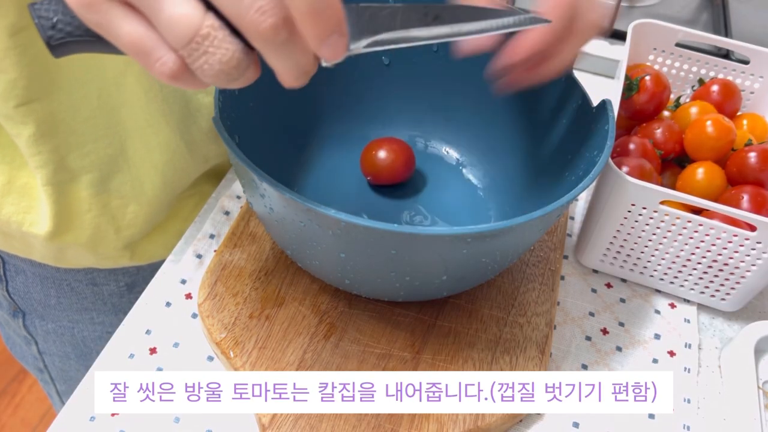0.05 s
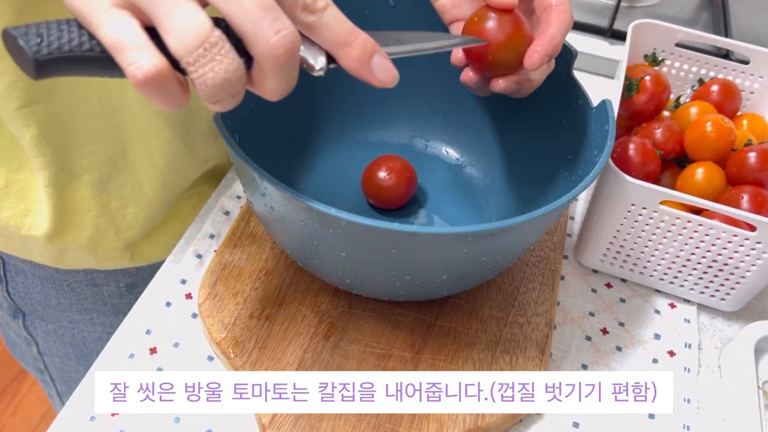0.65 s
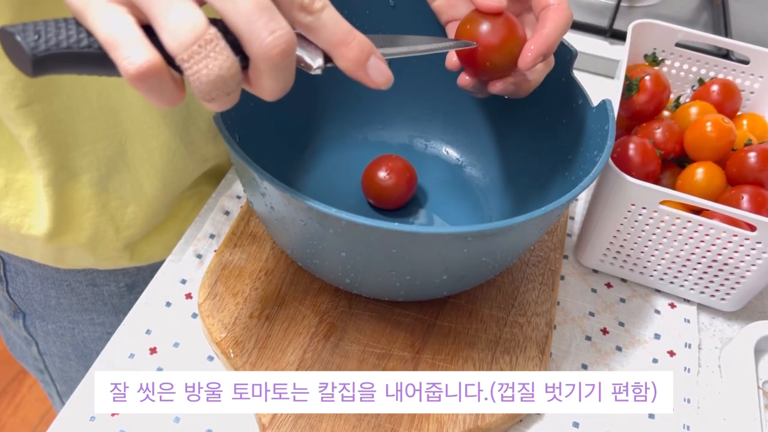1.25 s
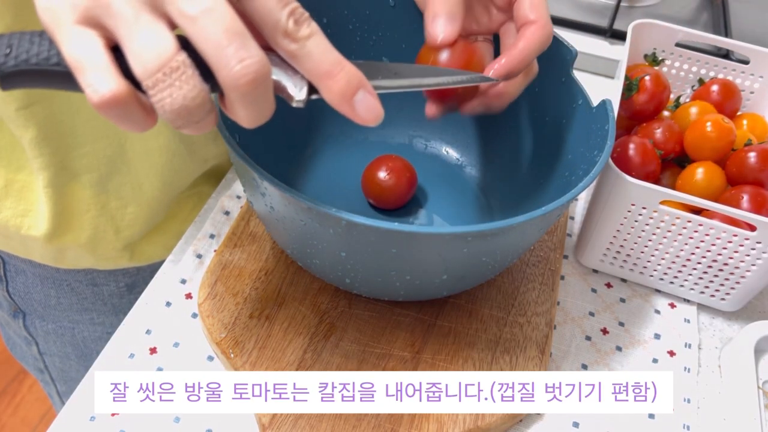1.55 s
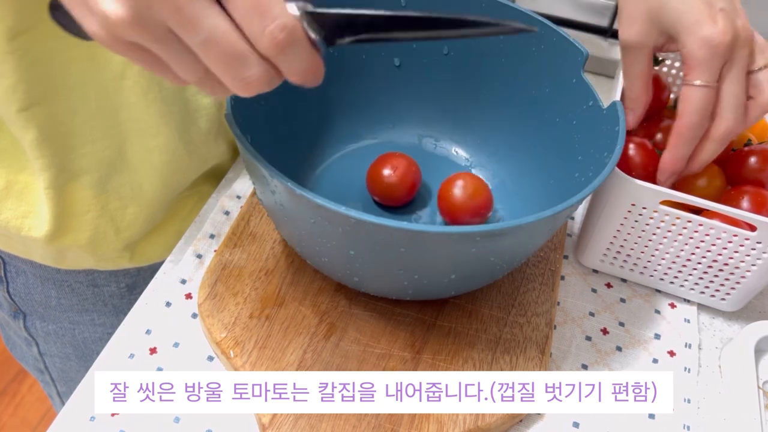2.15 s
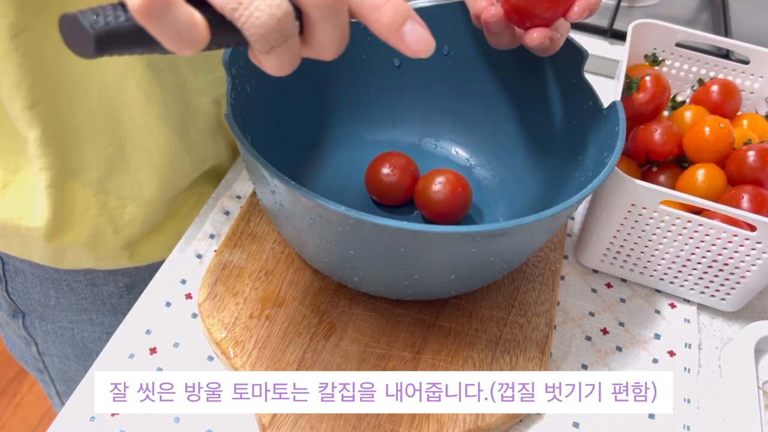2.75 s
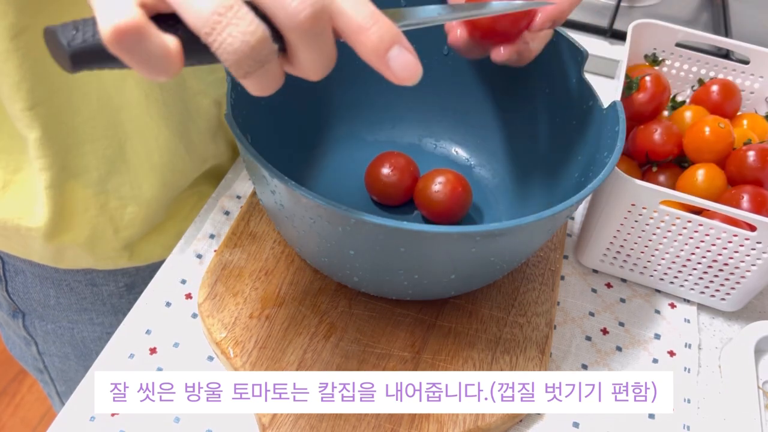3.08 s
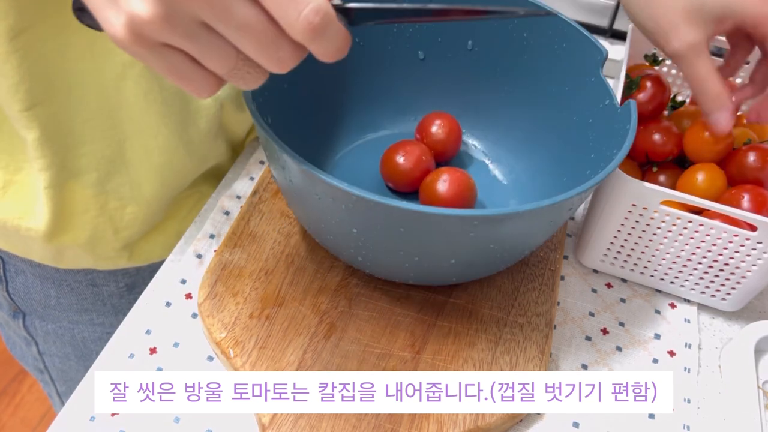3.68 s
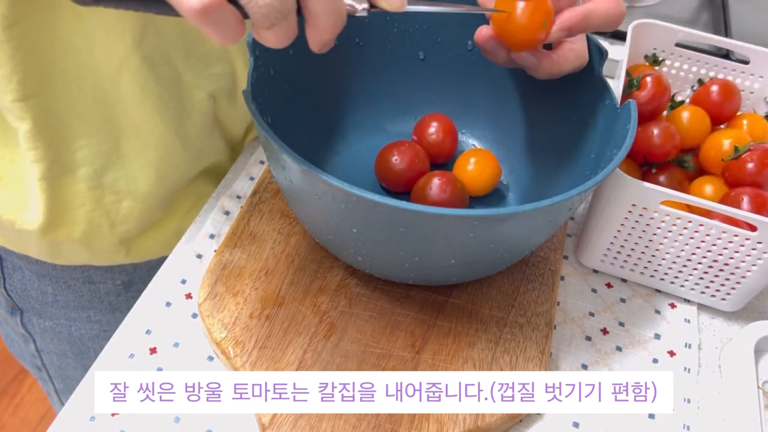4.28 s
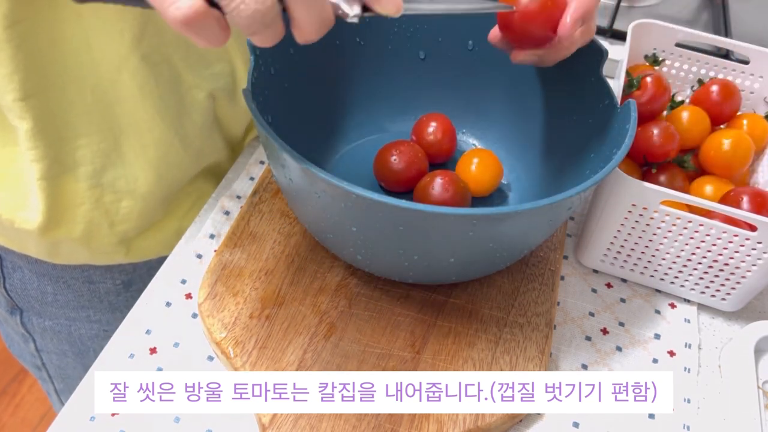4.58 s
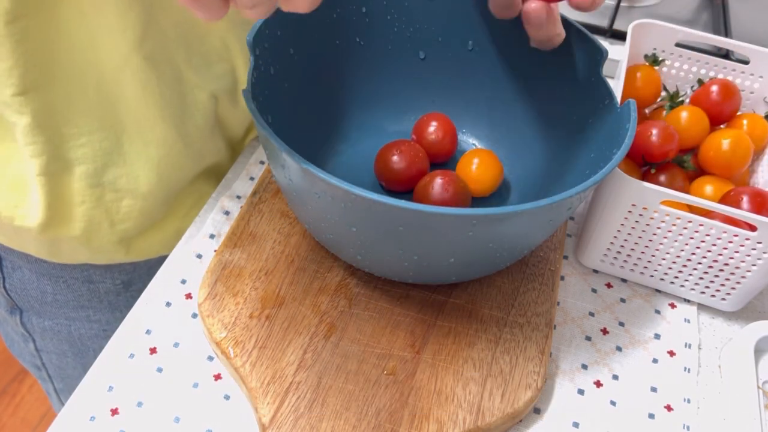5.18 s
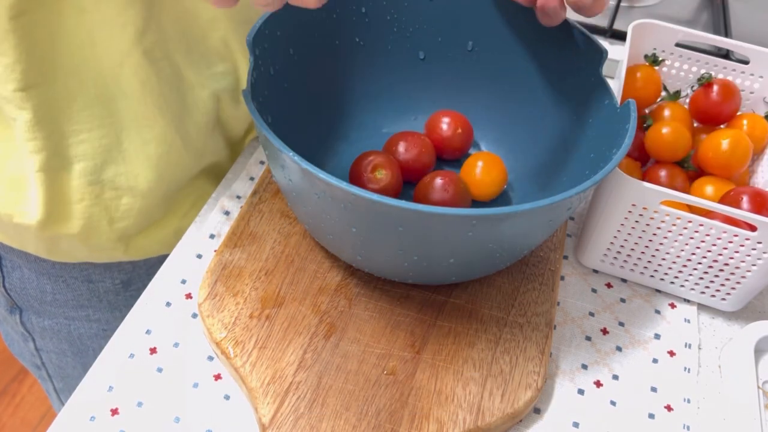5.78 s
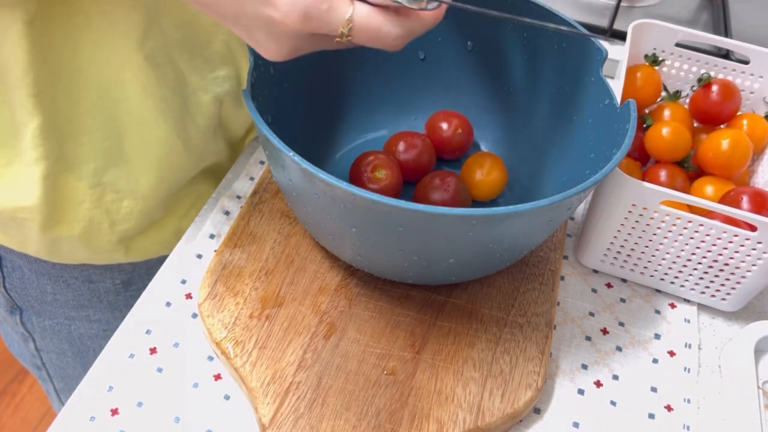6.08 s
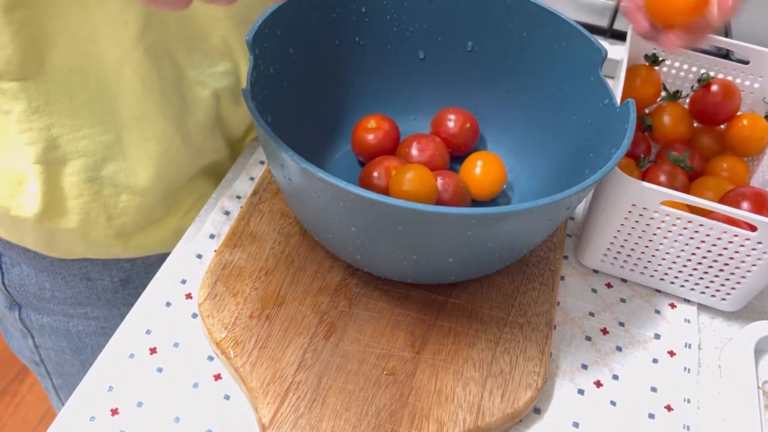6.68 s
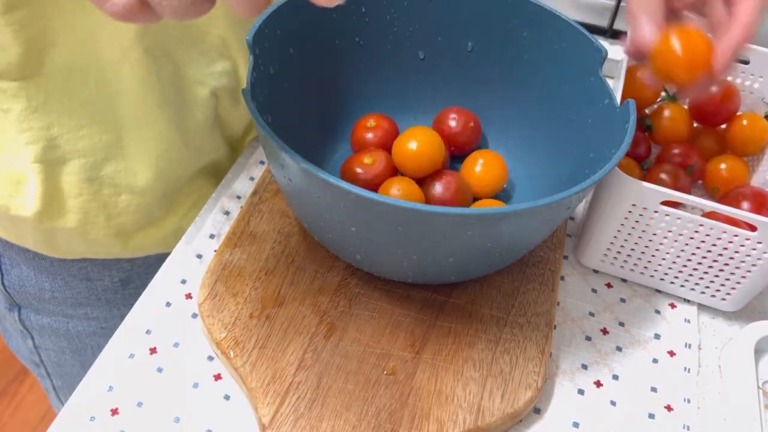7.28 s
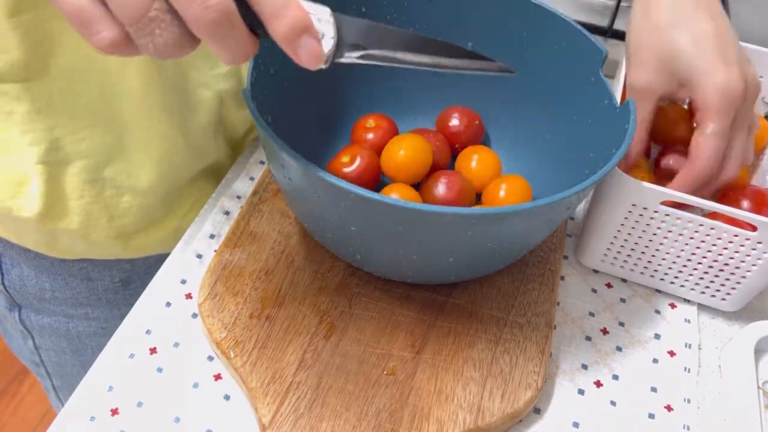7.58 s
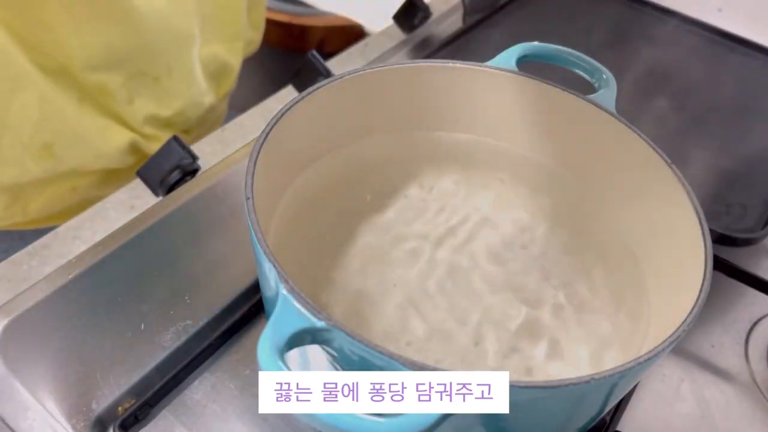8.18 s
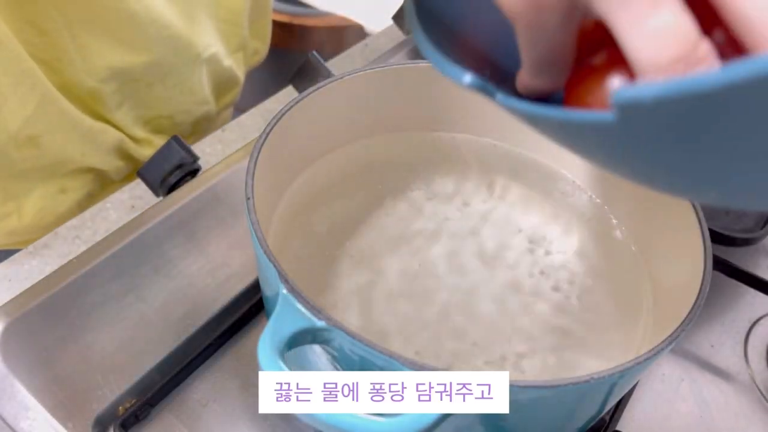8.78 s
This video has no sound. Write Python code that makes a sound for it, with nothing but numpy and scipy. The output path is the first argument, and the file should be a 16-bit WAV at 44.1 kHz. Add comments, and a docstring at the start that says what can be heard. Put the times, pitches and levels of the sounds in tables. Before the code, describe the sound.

A cherry tomato lands in a plastic bowl with a soft, hollow knock, followed by faint knife cuts, wet finger rubs and two more landings with clusters of bumps. The action then runs fast, turning the knocks into tiny, bright clicks. Finally the low kitchen hum gives way to bubbling water and a droning stove, and the bowl scrapes briefly on wood to the right. Everything is heard close up, in stereo.

```python
"""Cherry tomatoes drop into a plastic bowl on a wooden board, close to a phone's stereo microphone.
Each landing rings the bowl's modes; a small knife nicks the skins, wet fingers rub and squeak, and the
kitchen hums behind. The middle stretch runs eight times as fast, so hum, bowl and room sound three
octaves higher and shorter. Then a pot of water boils on the stove as the bowl is slid off the board."""
import sys
import numpy as np
from scipy import signal
from scipy.fft import rfft, irfft, next_fast_len
from scipy.io import wavfile

SR = 44100
rng = np.random.default_rng(int(sys.argv[2]) if len(sys.argv) > 2 else 0)


def digitize_waveform(pressure):
    """Quantize a signal to 16-bit integers and store it at the path in sys.argv[1].

    Rows of a 2-D input are taken as channels; values are limited to [-1, 1].
    """
    field = np.atleast_2d(pressure).T
    bounded = np.clip(field, -1, 1)
    quanta = np.round(bounded * 32767).astype(np.int16)
    wavfile.write(sys.argv[1], SR, quanta)


N = 394254
T = np.arange(N) / SR
FAST_FROM_S, FAST_TO_S, FAST_SPEED = 4.172, 7.98, 8
TOP_HZ = 16200


def undb(db):
    """Decibels to gain."""
    return 10 ** (np.asarray(db) / 20)


def unit(x):
    """Scale to rms 1."""
    return x / np.sqrt(np.mean(x ** 2))


def pan(db):
    """Left and right gains for a level difference, left minus right."""
    return undb(np.array([[db], [-db]]) / 2)


def add(out, s, sound):
    """Mix a sound in at s seconds."""
    start = int(np.clip(s * SR, 0, N))
    out[:, start:start + sound.shape[1]] += sound[:, :N - start]


def gate(start, end):
    """Open between two times, with 6 ms fades."""
    return np.clip(np.minimum(T - start, end - T) / .006 + .5, 0, 1)


def walk(rate):
    """Random levels joined by straight lines, rate of them a second."""
    count = int(N / SR * rate) + 2
    return np.interp(T * rate, np.arange(count), rng.standard_normal(count))


def swells(strokes):
    """Gain of slides (t/s, half length/s, level/dB) that speed up and slow down smoothly."""
    return sum(undb(db) * np.exp(-.5 * ((T - s) / half) ** 2) for s, half, db in strokes)


def colour(hz, points, db):
    """Decibels at hz on a spectrum drawn over log frequency."""
    return np.interp(np.log(np.maximum(hz, 1)), np.log(points), db)


def bins(size):
    """Frequencies of a spectrum of size samples."""
    return np.arange(size // 2 + 1) * SR / size


def noise(size, mid_db, side_db):
    """Stereo noise with the given mid and side densities, in dB per Hz at each bin."""
    spectrum = rfft(rng.standard_normal((2, size))) * undb([mid_db, side_db])
    mid, side = irfft(spectrum, size) * np.sqrt(SR / 2)
    return np.array([mid + side, mid - side])


def wash(table, speed=1):
    """Steady noise from rows (f/Hz, mid/dB, side/dB); a single level serves as both mid and side."""
    columns, size = np.transpose(table), next_fast_len(N)
    hz = bins(size) / speed
    mid_db, side_db = colour(hz, columns[0], columns[1]), colour(hz, columns[0], columns[-1])
    return noise(size, mid_db, side_db)[:, :N] / np.sqrt(speed)


def resonances(table, speed=1):
    """Air noise ringing in resonances (f/Hz, width/Hz, level/dB), unrelated left and right."""
    out = np.zeros((2, N))
    for hz, width, db in table:
        if hz * speed < TOP_HZ:
            b, a = signal.iirpeak(hz * speed, hz / width / 1.3, fs=SR)
            white = rng.standard_normal((2, N))
            out += unit(signal.lfilter(b, a, signal.lfilter(b, a, white))) * undb(db)
    return out


def band(hz, width):
    """Stereo noise in a narrow resonance whose centre may move."""
    turn = 2 * np.pi * np.cumsum(np.broadcast_to(hz, N)) / SR
    return unit(np.array([walk(width) * np.sin(turn) + walk(width) * np.cos(turn) for _ in range(2)]))


def friction(spectrum, strokes, grain_db=1.5):
    """Sliding contact: short swells of grainy noise."""
    return unit(wash(spectrum) * undb(grain_db * walk(430))) * swells(strokes)


def low_cut(x, speed, hz=21):
    """The microphone passes no deep bass; its limit rises with the playing speed."""
    return signal.sosfilt(signal.butter(4, hz * speed, "high", fs=SR, output="sos"), x)


# uneven treble colour: f/Hz, gain/dB
TREBLE_COLOUR = [(6000, 0), (8300, 3), (9500, -17.5), (10700, 4.5), (12800, -0.5), (14200, -4),
                 (15600, 2.5)]
def uneven_treble(x):
    """The treble is uneven, with dips near 9.5 and 14 kHz."""
    size = next_fast_len(N)
    gain = undb(colour(bins(size), *np.transpose(TREBLE_COLOUR)))
    return irfft(rfft(x, size) * gain, size)[:, :N]


# room tone of the kitchen, as noise density: f/Hz, mid/dB, side/dB
ROOM_TONE = [(18.6, -106, -122), (29.3, -76.5, -103), (39.8, -84, -102), (52, -73.5, -96.5),
             (90, -80.5, -96.5), (176, -92.5, -97.5), (204.3, -87.5, -89.5), (330, -93.5, -97),
             (590, -103, -102), (1000, -114, -111), (1697, -112, -111), (2120, -124, -124),
             (4016, -129, -129), (15550, -136, -136)]
# resonances in the room tone: f/Hz, width/Hz, level/dB
ROOM_RESONANCES = [(1147, 54, -82.5), (7170, 550, -85.5)]
# lines of the appliance hum: f/Hz, level/dB, phase between left and right/rad
HUM_LINES = [(53.07, -59, .05), (59.7, -70.5, 0.13), (197.4, -73.5, 2.5), (216.8, -74.5, 0.52),
             (279, -79, 0.53), (320, -77.5, 0.46), (646, -85, 0.43)]
def kitchen(speed, db, waver_db=1.0, drift_rad=0.15):
    """Air all around the microphone and a slightly wavering appliance hum, played at a speed."""
    out = wash(ROOM_TONE, speed) + resonances(ROOM_RESONANCES, speed)
    for hz, line_db, lag in HUM_LINES:
        phase = 2 * np.pi * hz * speed * T + drift_rad * walk(2 * speed)
        level = undb(line_db + waver_db * walk(2 * speed))
        out += np.sqrt(2) * np.sin(phase + np.array([[0], [lag]])) * level
    return out * undb(db)


# resonances of the stove: f/Hz, width/Hz, level/dB
STOVE_RESONANCES = [(53.6, 5, -66), (154.3, 11, -65), (294, 16, -65), (345, 27, -66.5), (581.4, 12, -68.5),
                    (696, 8, -68), (744, 12, -70), (867, 25, -66), (1014, 29, -69)]
def stove_drone():
    """The stove drones under the boil in narrow bands of noise."""
    return resonances(STOVE_RESONANCES)


# rolling boil over the burner, as noise density: f/Hz, mid/dB, side/dB
BOIL_SPECTRUM = [(24.8, -68.5, -92), (61.6, -72.5, -105), (162, -70.5, -104), (210, -85.5, -104),
                 (350, -80.5, -98), (423, -92, -94), (905, -85, -92), (1470, -96.5, -100),
                 (2120, -105, -107), (2840, -111, -110), (4230, -112, -113), (7650, -108, -109),
                 (12500, -113, -114), (16500, -121, -121)]
# air over the water, between the walls of the pot: f/Hz, width/Hz, level/dB
POT_AIR = [(780, 300, -62), (2125, 170, -67), (2613, 52, -74.5), (3330, 460, -71), (5340, 670, -67.5)]
def boiling_pot(count=400, bubble_db=-62, spread_db=3, low_hz=280, high_hz=1150, churn_db=-3.5, db=-1):
    """Steam churns the water and sends up a dense stream of bubbles, spread left and right."""
    out = (wash(BOIL_SPECTRUM) + resonances(POT_AIR)) * undb(db + churn_db * walk(18))
    for when, smallness, strength, side in rng.random((count, 4)):
        s = FAST_TO_S + when * (N / SR - FAST_TO_S)
        hz = low_hz * (high_hz / low_hz) ** smallness
        level_db = bubble_db + spread_db * min(-np.log(1 - strength), 3)
        add(out, s, bubble(hz) * undb(level_db) * pan(8 * (side - .5)))
    return out


def bubble(hz, cycles=10, glide=0.13):
    """A bubble rings briefly and rises in pitch as it surfaces."""
    t = np.arange(2048) / SR
    age = t * hz / cycles
    rise = 1 + glide * np.minimum(age, 2) / 2
    return np.sin(2 * np.pi * hz * t * rise) * np.exp(-3 * age)


# modes of something hard at the stove: f/Hz, relative level/dB, t60/s
CLINK_MODES = [(1303, 0, .1), (1370, 8, 0.05), (1580, -6, 0.074), (1940, -5, .08), (2450, -1, 0.076)]
def clink(s=8.025, level_db=-43, rise_s=0.0011):
    """A light touch rings a few modes, out of step left and right."""
    t = np.maximum(T - s, 0)
    rings = sum(np.sin(2 * np.pi * hz * t + rng.standard_normal((2, 1))) * undb(db - 60 * t / t60)
                for hz, db, t60 in CLINK_MODES)
    return rings * (1 - np.exp(-t / rise_s)) * undb(level_db)


# small dry clicks: t/s, level/dB, f/Hz, t60/s
DRY_CLICKS = [(0.191, -49, 2460, 0.0031), (2.42, -53, 4790, 0.017), (2.659, -61.5, 3500, 0.0034),
              (3.523, -34.5, 4370, 0.011), (4.998, -50.5, 5800, 0.014), (5.33, -53.5, 4800, 0.014),
              (5.891, -53, 12400, 0.027), (6.034, -49, 6700, 0.015), (8.537, -47, 3800, .018)]
def clicks(slope_db=12, size=2048):
    """Tiny clicks, each a short burst of noise bright around its own pitch."""
    out, t = np.zeros((2, N)), np.arange(size) / SR
    for s, db, hz, t60 in DRY_CLICKS:
        shape_db = -slope_db * abs(np.log2(np.maximum(bins(size), 1) / hz))
        add(out, s, unit(noise(size, shape_db, shape_db + 0.5)) * undb(db - 60 * t / t60))
    return out


# a sharp pull and a light slide off the board: middle t/s, half length/s, level/dB
DRAG_STROKES = [(8.526, 0.028, -40.5), (8.635, 0.069, -54)]
# scrape of plastic on wood: f/Hz, relative level/dB
DRAG_SPECTRUM = [(300, -22), (650, 5), (950, -36), (1280, 10.5), (1650, -8), (2150, 5.5), (3150, 4),
                 (4200, 5), (5500, 1), (8000, -7), (16000, -20)]
# squeal of the foot, its pitch rising, dipping and rising again: t/s, f/Hz
SQUEAL_PITCH = [(8.48, 3200), (8.52, 3560), (8.56, 2730), (8.68, 3440)]
def bowl_drag(grain_db=1.0, pan_db=-7, squeal_db=-0.5, squeal_width_hz=900):
    """The foot of the bowl catches and slips on the wood, to the right of the microphone."""
    squeal = band(np.interp(T, *np.transpose(SQUEAL_PITCH)), squeal_width_hz)
    scrape = unit(wash(DRAG_SPECTRUM)) + squeal * undb(squeal_db)
    return unit(scrape * undb(grain_db * walk(300))) * swells(DRAG_STROKES) * pan(pan_db)


# a hand passing over the fruit: middle t/s, half length/s, level/dB
BRUSH_STROKES = [(3.294, 0.037, -77.5), (3.68, .025, -75.5), (3.738, .022, -74.5)]
# its swish: f/Hz, relative level/dB
BRUSH_SPECTRUM = [(1000, 5), (3000, -3), (7500, 0.5), (12000, -7), (16000, -15)]
def hand_brushes():
    """A wet hand brushes the fruit as it draws back."""
    return friction(BRUSH_SPECTRUM, BRUSH_STROKES)


# finger slips: middle t/s, half length/s, level/dB, f/Hz, width/Hz
FINGER_SLIPS = [(0.181, 0.004, -70, 2700, 1000), (2.618, 0.017, -68.5, 1075, 602),
                (2.83, 0.016, -79, 2780, 1310), (7.751, 0.0053, -55, 2880, 400),
                (8.416, 0.0018, -46, 3400, 1300)]
def finger_squeaks():
    """Wet fingers slip on the fruit, each squeak in its own narrow band."""
    return sum(band(hz, width) * swells([(s, half, db)]) for s, half, db, hz, width in FINGER_SLIPS)


# strokes of the knife: middle t/s, half length/s, level/dB
SLIT_STROKES = [(1.187, 0.01, -84), (1.383, 0.012, -69), (1.48, .02, -79), (1.616, 0.055, -73.5),
                (2.965, 0.025, -70)]
# hiss of parting skin: f/Hz, relative level/dB
SLIT_SPECTRUM = [(1200, 0), (3000, -1.5), (11000, -4), (16000, -10.5)]
def knife_slits():
    """Tomato skin parts under the blade with a faint, grainy hiss."""
    return friction(SLIT_SPECTRUM, SLIT_STROKES)


# slides inside the bowl: middle t/s, half length/s, level/dB
RUB_STROKES = [(1.899, 0.022, -49), (2.434, 0.02, -74), (3.207, 0.027, -71), (3.46, 0.017, -58.5),
               (3.49, .014, -68), (3.548, 0.016, -49.5), (8.048, 0.015, -50)]
# rub of skin on plastic: f/Hz, relative level/dB
RUB_SPECTRUM = [(300, -5), (1200, 3.5), (2800, 7), (5000, 1), (8000, -4.5), (12000, -9.5), (16000, -20)]
def skin_rubs():
    """Wet skin slips on the plastic."""
    return friction(RUB_SPECTRUM, RUB_STROKES)


def contact(hz, thud_db, knock_db, knock_hz, tick_db):
    """Push in dB at hz: soft flesh rocks the bowl, firm skin knocks its wall, a hard touch ticks."""
    thud_fall, knock_rise, knock_fall, tick_rise = 15, 7, 11, 9  # dB per octave
    octave = np.log2(np.maximum(hz, 1))
    thud = thud_db - thud_fall * np.maximum(octave - np.log2(95), 0)
    above = octave - np.log2(knock_hz)
    knock = knock_db - np.maximum(knock_fall * above, -knock_rise * above)
    tick = tick_db - tick_rise * np.maximum(np.log2(1250) - octave, 0)
    return 10 * np.log10(undb(thud) ** 2 + undb(knock) ** 2 + undb(tick) ** 2)


# dense ring of the plastic wall, as noise density: f/Hz, level/dB
WALL_SPECTRUM = [(50, -50.5), (110, -19), (200, -11), (390, -19.5), (490, -27.5), (590, -13), (780, -23),
                 (1250, -24.5), (1700, -29.5), (2600, -29.5), (3500, -35.5), (7000, -45.5), (11000, -51.5),
                 (16000, -59.5)]
def wall_crack(t, push, speed, crack_t60=0.026, room_db=-19, room_t60=0.24, rise_s=0.001):
    """The plastic cracks briefly; the kitchen's answer builds at the microphone within milliseconds."""
    size = len(t)
    hz = bins(size) / speed
    mid_db = colour(hz, *np.transpose(WALL_SPECTRUM)) + contact(hz, *push)
    side_db = mid_db + colour(hz, [100, 700, 5000], [-16, -3, 0])
    crack = noise(size, mid_db, side_db) * undb(-60 * t / crack_t60)
    room = noise(size, mid_db, side_db) * undb(room_db - 60 * t / room_t60) * np.clip(t / 0.0077, 0, 1)
    return (crack + room) / np.sqrt(speed) * (1 - np.exp(-t / rise_s))


# modes of the bowl on its board: f/Hz, relative level/dB, t60/s, left minus right/dB
BOWL_MODES = [(59.47, -8, 0.53, 1.5), (76.2, -16, 0.39, 6.5), (87.2, -1.5, 0.34, 0),
              (118.2, -3.5, 0.19, -1.5), (140.3, -12.5, .15, 0.5), (205.9, 2, 0.11, 0.5),
              (307, 0, 0.076, 5.5), (348.6, -9, 0.26, 4.5), (392.4, -2, 0.1, 3), (423, -7, 0.14, 4.5),
              (586, -3, 0.098, 7.5), (627, -8.5, .12, 5.5), (697, -13.5, 0.26, 4.5), (1036, -7.5, 0.12, -5),
              (1185, -10, 0.044, -5), (1230, -5, 0.065, -0.5), (1284, -4, 0.072, -3),
              (1996, -5.5, 0.036, 4), (2110, -8.5, 0.086, 2), (2427, -2.5, 0.056, -2.5),
              (2598, 1, 0.037, -2.5), (2827, 0, 0.034, -1), (2970, -8.5, 0.084, 4), (3970, -16, 0.012, 4),
              (4760, -11.5, 0.04, -3)]
def bowl_ring(t, push, speed, scatter_db=2, detune=0.009, load_hz=2.74, wide_hz=700, rise_cycles=0.55,
              favour_db=6, favour_octaves=0.044):
    """One push rings the modes of the bowl, each dying away at its own rate."""
    out, knock_hz = np.zeros((2, len(t))), push[2]
    chances = rng.standard_normal((len(BOWL_MODES), 3))
    for (hz, db, t60, pan_db), (place, load, angle) in zip(BOWL_MODES, chances):
        if hz * speed < TOP_HZ:
            # short waves differ more with the place of the blow, and between left and right
            spread = min(hz / wide_hz, 1.1)
            phase = spread * (np.array([[-.5], [.5]]) * (1 + .5 * angle) + 2 * place)
            # the fruit lying in the bowl loads it differently each time, most of all its rocking
            pitch = hz + load * max(detune * hz, load_hz)
            ring = np.sin(2 * np.pi * pitch * t + phase) * undb(-60 * t / t60)
            ring *= 1 - np.exp(-t * hz / rise_cycles)  # slow modes take longer to build up
            # the mode that moves most at the struck spot stands out
            spot_db = favour_db * np.exp(-(np.log2(hz / knock_hz) / favour_octaves) ** 2)
            level_db = db + spot_db + contact(hz, *push) + scatter_db * spread * place
            out += ring * pan(pan_db) * undb(level_db)
    return out


# taps on the wall of the bowl: t/s, tick level/dB, favoured f/Hz
WALL_TAPS = [(.002, -49, 1300), (.016, -59, 1284), (.044, -67, 586), (.1005, -63, 1230), (.109, -63, 1230),
             (1.736, -46.5, 330), (1.816, -43, 330), (1.824, -49, 330), (1.949, -45.5, 330),
             (1.9743, -47, 1230), (1.9796, -38, 206.5), (1.992, -46.5, 388), (2.0, -43, 1284),
             (2.0065, -49, 213), (2.017, -56, 586), (2.055, -60.5, 400), (2.421, -74.5, 1284),
             (3.390, -58, 1260), (3.413, -54.5, 1220), (3.524, -47.5, 1234), (3.535, -46, 1310),
             (3.549, -47.5, 2120), (4.4275, -44, 1290), (4.442, -42.5, 320), (5.1066, -45.5, 384),
             (5.1426, -47, 309), (7.2478, -53, 296), (7.855, -47.5, 382)]
def taps(thud_db=0.5, knock_db=5.5):
    """The knife, a fingernail or a rattling rebound strikes the wall with no time to press in."""
    return [(s, (db + thud_db, db + knock_db, hz, db, 0)) for s, db, hz in WALL_TAPS]


def soft_touch(db, firmness, knock_hz=296, soft_db=-20.5, tick_db=-11.5, dull_db=-3, press_s=0.01):
    """Something soft rocks the bowl; the firmer it is, the sooner, with more knock and tick."""
    softness = 1 - min(firmness, 1)
    knock_db = db + soft_db * softness
    return db, knock_db, knock_hz, knock_db + tick_db + dull_db * softness, press_s * softness


# soft bumps against the bowl: t/s, thud level/dB, firmness/0-1
BOWL_NUDGES = [(0.102, -40, 0.74), (.135, -47, 0.65), (1.747, -31, 0), (1.787, -47.5, 1),
               (1.823, -31.5, 0.74), (1.852, -30.5, 0.89), (1.875, -29, 0.74), (1.927, -33.5, 0.7),
               (3.192, -41, 0.4), (3.414, -31, 0.36), (3.450, -32, 0.64), (3.486, -31, 0.73),
               (4.434, -30.5, 0.8), (5.1075, -30, 0.46), (5.118, -36, 0.6), (5.571, -29, 0.68),
               (6.3078, -31.5, 0.6), (6.653, -38.5, 0.8), (6.930, -38, 0.64), (7.2144, -31, 0.66),
               (7.226, -28, 0.55), (7.294, -38.5, 0.1), (7.537, -35.5, 0), (7.621, -36, 0.23),
               (7.627, -32, 0.4), (7.8347, -30, 0.4), (7.8422, -29, 0.4), (7.853, -33.5, 0.3),
               (7.920, -36, 0.52)]
def nudges():
    """Fingers and rolling fruit nudge the bowl."""
    return [(s, soft_touch(db, firmness)) for s, db, firmness in BOWL_NUDGES]


# tumbles inside the bowl: t/s, length/s, thud level/dB, firmness/0-1
TOMATO_ROLLS = [(0.113, 0.033, -46.5, 0.81), (3.494, 0.028, -38, 0.86), (5.113, .014, -40, 0.7),
                (6.309, 0.012, -44, 0.84), (7.539, .014, -40.5, 0.57), (7.63, 0.0082, -36.5, 0.2),
                (7.885, 0.017, -43.5, 0.6), (7.93, 0.0085, -42.5, 0.6)]
def rolls(bumps=3):
    """A tomato tumbles over the others, bump after uneven bump."""
    out = []
    for s, length, db, firmness in TOMATO_ROLLS:
        ages = (np.arange(bumps) + rng.random(bumps)) / bumps
        out += [(s + age * length, soft_touch(db, firmness)) for age in ages]
    return out


# a landing's thud and tick relative to its knock: hardness/0-1, thud/dB, tick/dB
LANDING_BALANCE = [(0, -3, -78), (.5, 8, -18.5), (1, -27, -4.5)]
def landing(db, hz, hardness, press_s=0.0067):
    """Touch of a falling tomato: slow and thudding on other fruit, sudden and ticking on plastic."""
    steps, thuds, ticks = np.transpose(LANDING_BALANCE)
    thud_db = db + np.interp(hardness, steps, thuds)
    tick_db = db + np.interp(hardness, steps, ticks)
    return thud_db, db, hz, tick_db, press_s * (1 - min(hardness, 1))


# tomatoes landing: t/s, knock level/dB, favoured f/Hz, hardness/0-1 (other fruit to bare plastic)
TOMATO_DROPS = [(.006, -29.5, 488, 0.1), (1.969, -25.5, 361, 1), (3.541, -36, 210, 0.8),
                (4.410, -28.5, 555, 0.63), (5.0836, -27, 576, 0.59), (5.560, -35.5, 330, 0.96),
                (6.324, -27, 230, 0.71), (6.634, -31, 505, 0.05), (6.915, -27.5, 560, 0.12),
                (7.2484, -38, 242, 0.47), (7.567, -34.5, 300, 0.58)]
def drops(hop_s=.03, hop_db=-12, hop_pitch=0.48, hop_hardness=0.41,
          wobbles=3, settle_s=0.37, settle_db=-42.5, fade_db=-10, speed=1):
    """Each tomato lands, hops once, lower and softer, then wobbles to rest."""
    out = []
    for s, db, hz, hardness in TOMATO_DROPS:
        out.append((s, landing(db, hz, hardness)))
        out.append((s + hop_s / speed, landing(db + hop_db, hz * hop_pitch, hardness * hop_hardness)))
        for age in (np.arange(wobbles) + rng.random(wobbles)) / wobbles:
            out.append((s + age * settle_s / speed, soft_touch(settle_db + fade_db * age, 1 - age)))
    return out


def tomatoes_in_bowl(speed):
    """The bowl, close to the microphone, answers every touch in the stretches played at this speed."""
    out = np.zeros((2, N))
    t = np.arange(24576 // speed) * speed / SR
    # a touch is: thud/dB, knock/dB, knock f/Hz, tick/dB, time to press in/s
    for s, (*push, press_s) in drops(speed=speed) + rolls() + nudges() + taps():
        if (FAST_FROM_S < s < FAST_TO_S) == (speed > 1):
            blow = bowl_ring(t, push, speed) + wall_crack(t, push, speed)
            press = 1 - np.exp(-t / max(press_s, 1 / SR))
            add(out, s, blow * press)
    return out


def scene():
    """Three stretches in one kitchen: at the board, at the board sped up, by the stove."""
    board = kitchen(1, db=0) * gate(-1, FAST_FROM_S) + tomatoes_in_bowl(1)
    board += skin_rubs() + knife_slits() + hand_brushes()
    fast = kitchen(FAST_SPEED, db=-0.5) * gate(FAST_FROM_S, FAST_TO_S) + tomatoes_in_bowl(FAST_SPEED)
    stove = (boiling_pot() + stove_drone()) * gate(FAST_TO_S, 10) + bowl_drag() + clink()
    normal_speed = uneven_treble(low_cut(board + stove, 1))
    return normal_speed + low_cut(fast, FAST_SPEED) + clicks() + finger_squeaks()


def record(dry):
    """The phone cuts the treble steeply above TOP_HZ."""
    return signal.sosfilt(signal.ellip(8, .2, 70, TOP_HZ, fs=SR, output="sos"), dry)


dry = scene()
out = record(dry)
digitize_waveform(out)
```